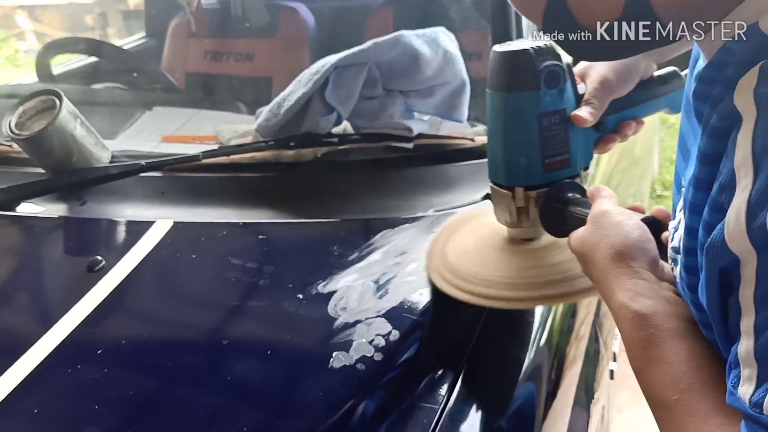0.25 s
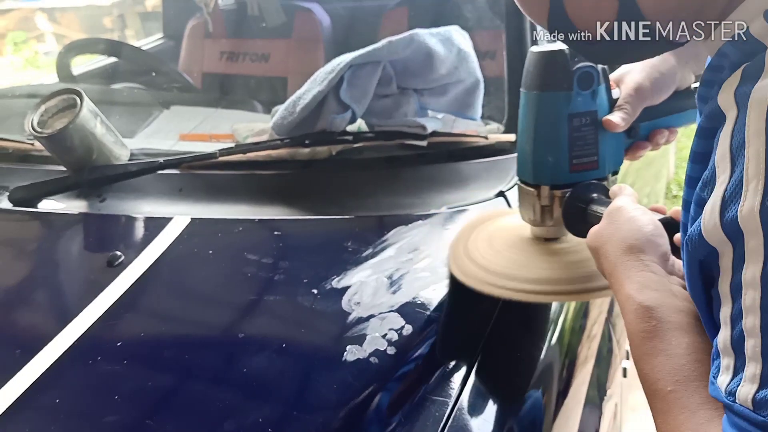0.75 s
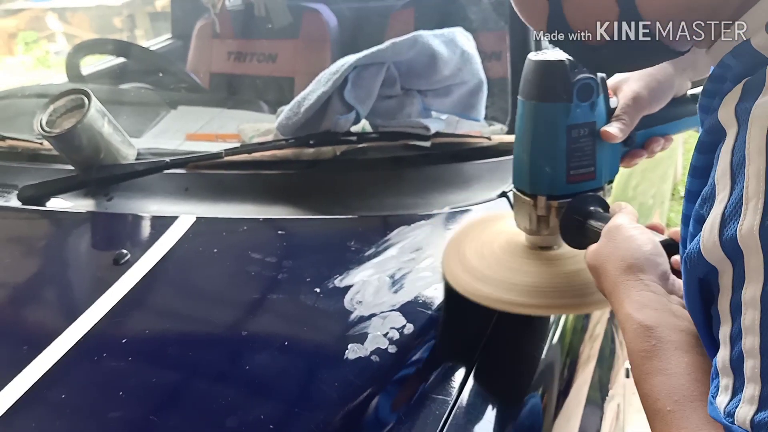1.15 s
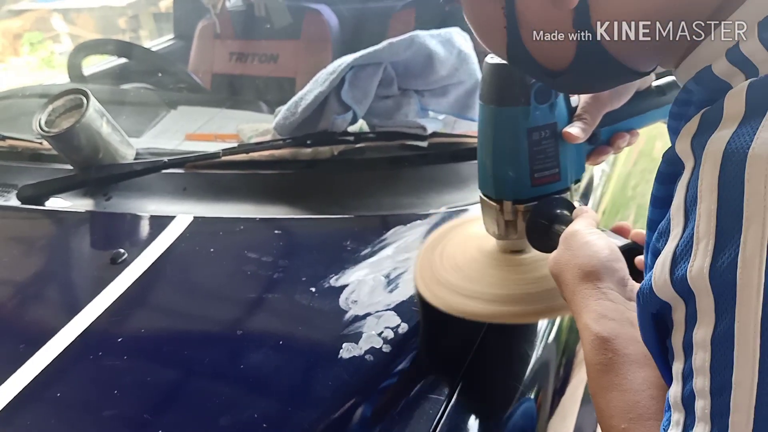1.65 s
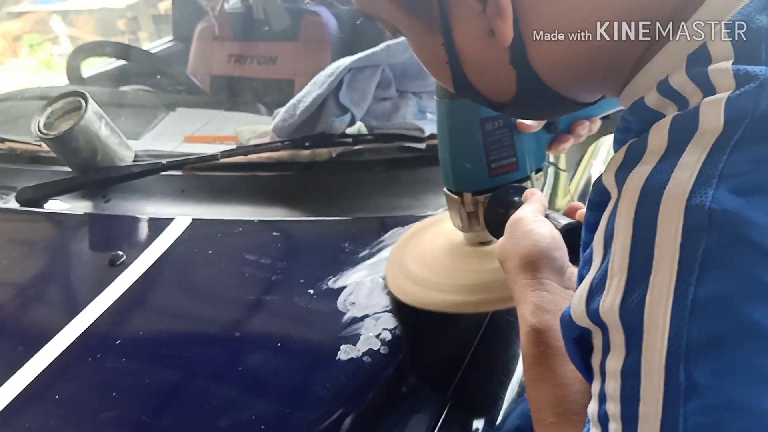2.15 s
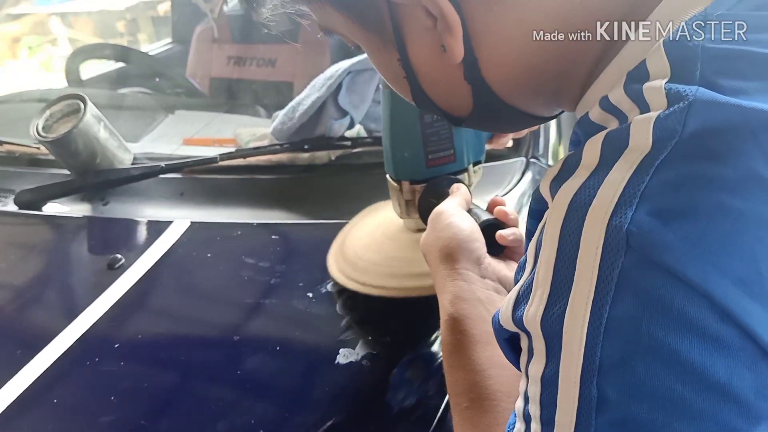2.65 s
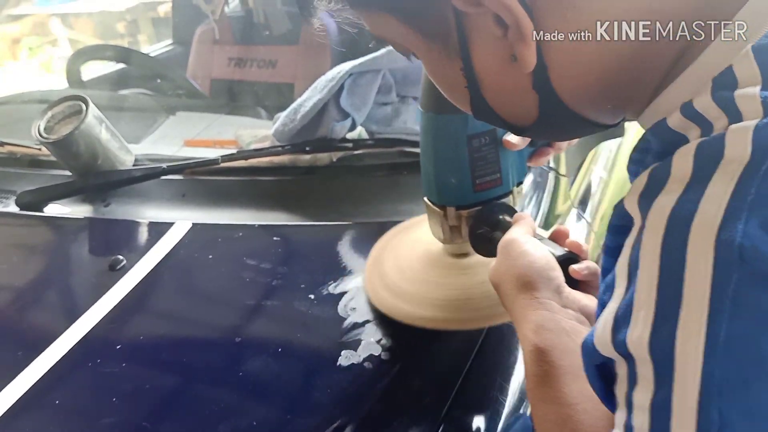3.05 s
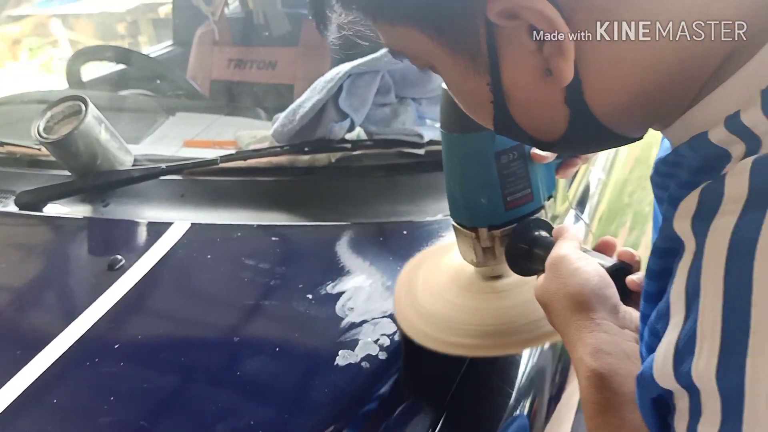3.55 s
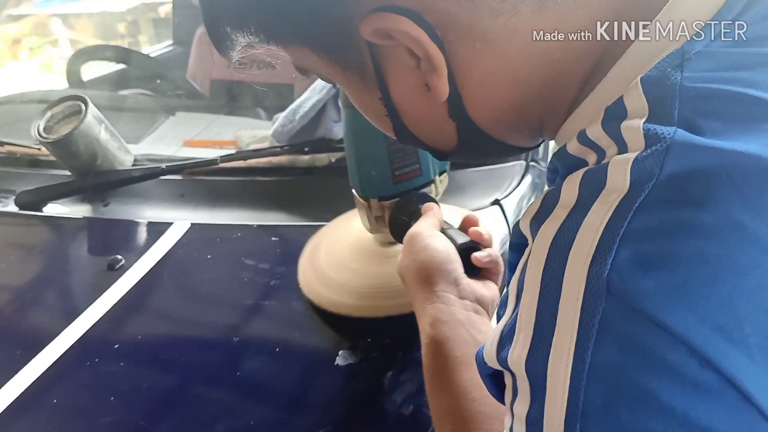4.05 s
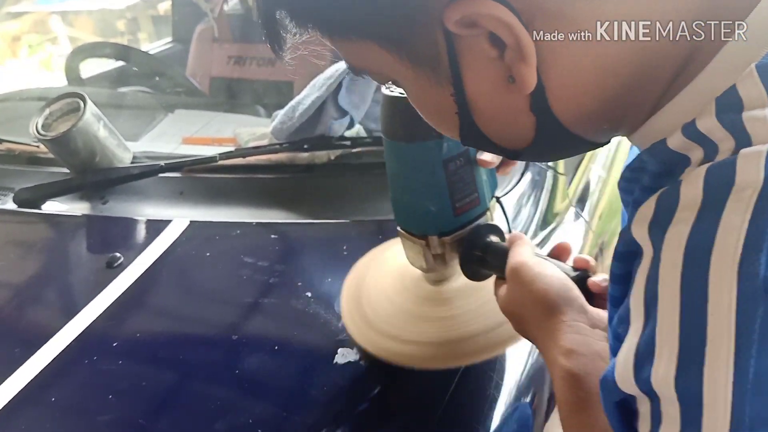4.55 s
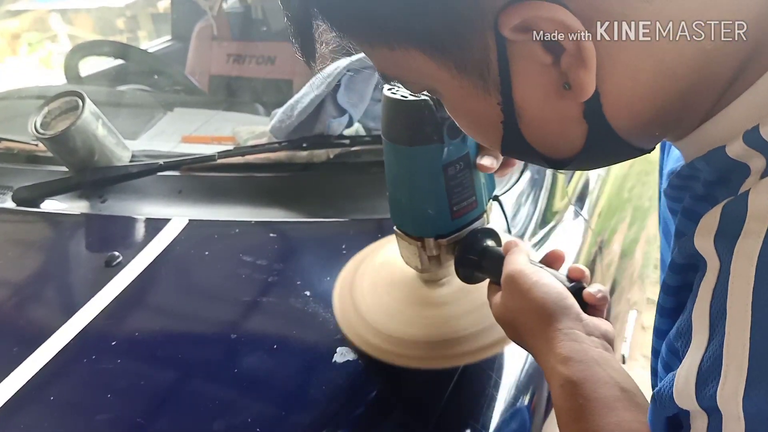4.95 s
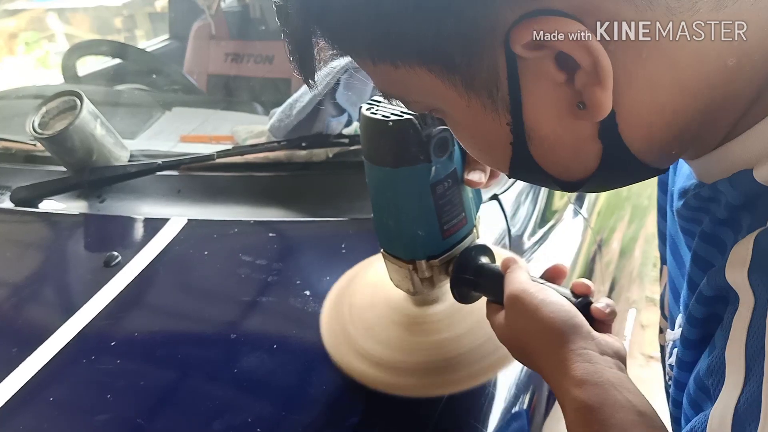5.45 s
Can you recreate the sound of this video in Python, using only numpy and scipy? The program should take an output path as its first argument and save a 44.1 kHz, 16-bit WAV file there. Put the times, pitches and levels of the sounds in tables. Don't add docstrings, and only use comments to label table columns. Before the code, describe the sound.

Close up, a hand-held power polisher revs to a harsh geared whine and buffs a metal panel, its pitch drifting slightly with pressure.

```python
import sys
import numpy as np
from scipy import signal
from scipy.fft import rfft, irfft, next_fast_len
from scipy.io import wavfile
from scipy.ndimage import uniform_filter1d, minimum_filter1d, map_coordinates

SR = 44100
rng = np.random.default_rng(int(sys.argv[2]) if len(sys.argv) > 2 else 0)


def nominal_scale(level):
    x = np.asarray(level, float) / 20
    return 10 ** x


def bounce(signal):
    frames = np.transpose(np.atleast_2d(signal))
    limited = np.clip(frames, -1, 1)
    pcm = np.round(limited * 32767).astype(np.int16)
    wavfile.write(sys.argv[1], SR, pcm)


N = 250929
TIME = np.arange(N) / SR
PINION_TEETH, CROWN_TEETH = 7, 41
# [t/s, tooth load/dB, pad pressure/dB, vents facing the phone/dB]
HANDLING = [(0, -4, 4, -5), (.1, 0, 0.5, -1), (.35, 1.5, 3, 1.5), (.75, -1.5, 2, -1), (1.0, -1, -0.5, -3),
            (1.3, -0.5, -2, 0), (1.75, 1.5, 1.5, -1), (2.2, -0.5, -1.5, -1.5), (2.7, -5, -0.5, -0.5),
            (2.97, -3, 2, 1), (3.25, 0, 0, 0), (3.6, -3, -1, 0), (3.85, 0, 0, 0.5), (4.1, -3.5, -1.5, 0.5),
            (4.35, -3, 2, 0), (4.75, 0, -1, 2), (5.05, -3.5, -1.5, 1), (5.69, -3.5, -1, 2)]


def unit(x):
    return x / np.sqrt(np.mean(x ** 2) + 1e-20)


def along(points, hz):
    f, level_db = np.transpose(points)
    return np.interp(np.log(hz + 1), np.log(f + 1), level_db)


def curves(rows):
    s, *columns = np.transpose(rows)
    return [np.interp(TIME, s, column) for column in columns]


def bump(at_s, width_s):
    return np.exp(-((TIME - at_s) / width_s) ** 2)


def wobble(rate):
    return map_coordinates(rng.standard_normal(int(N * rate / SR) + 4), [TIME * rate], order=1)


def turning(rows):
    return sum(db * bump(s, width) for s, width, db in rows)


def housing(hz):
    # [f/Hz, width/Hz, rms level of a full-strength tone/dB]
    modes = [(1070, 270, -33), (1561, 495, -25), (2326, 83, -25), (2729, 460, -26), (3327, 75, -30),
             (3565, 390, -24), (4690, 1030, -33.5), (5500, 630, -25.5), (6156, 160, -30), (7610, 190, -39),
             (8144, 320, -36), (9780, 240, -35), (11250, 760, -43), (13000, 400, -60)]
    power = 0
    for centre, width, db in modes:
        power = power + (nominal_scale(db) / (1 + (2 * (hz - centre) / width) ** 2)) ** 2
    return 10 * np.log10(power)


def tone(angle, db, flutter_db, rate):
    return np.sqrt(2) * nominal_scale(db + flutter_db * wobble(rate)) * np.sin(angle + 2 * np.pi * rng.random())


def rush(spectrum, patchy_db):
    z = signal.stft(rng.standard_normal(N + 512), nperseg=512)[2]
    field = uniform_filter1d(rng.standard_normal(z.shape), size=4, axis=0)
    field = uniform_filter1d(field, size=16, axis=1)
    x = signal.istft(z * nominal_scale(patchy_db * unit(field)), nperseg=512)[1][:N]
    m = next_fast_len(N + 8192)
    colour = nominal_scale(along(spectrum, np.fft.rfftfreq(m, 1 / SR)))
    return unit(irfft(rfft(x, m) * colour, m)[:N])


def roar(pad, cage, mains):
    # [f/Hz, level/dB per Hz]
    case_low = [(310, -50), (520, -14), (616, -19), (740, -3), (800, 2), (845, -3.5), (873, 6.5),
                (905, -0.5), (1030, -0.5), (1170, -4), (1290, -4), (1400, -8.5), (1820, -31), (3080, -120)]
    case_high = [(710, -60), (1200, -23), (1360, -7), (1570, -2.5), (1730, -2.5), (1950, -4.5), (2360, 4.5),
                 (2810, -4.5), (3400, -21), (4420, -23), (7480, -120)]
    fan_air = [(1760, -26), (3000, -0.5), (3410, -8), (3900, -3), (4500, -11), (5480, -6.5), (6790, -22.5),
               (8000, -31), (10400, -60), (17600, -120)]
    brush_hiss = [(4500, -43), (6900, -4), (7700, -3), (8500, -0.5), (9300, -6), (10100, -1), (10600, -3),
                  (11400, -0.5), (12100, -4.5), (12600, -2), (13400, 0.5), (14300, -4), (15500, -6),
                  (16500, -60)]
    paint_rub = [(26, -41), (45, -35), (65, -21), (86, -5.5), (188, -7), (226, -1), (268, -4.5), (403, 1.5),
                 (607, -6.5), (680, 1), (880, -24), (1500, -120)]

    _, press_db, facing_db = curves(HANDLING)
    skip_db = -12 * bump(5.27, .022)
    growl_db = 3.5 * bump(.31, .22)
    low_db = -37 + .41 * press_db + growl_db
    high_db = -24.5 + press_db + .27 * skip_db
    fan_db = -32 + .59 * press_db + facing_db
    brush_db = -54.5 + .18 * press_db + 1.05 * facing_db
    rub_db = -46.5 + .33 * press_db + skip_db

    drag = wobble(30)
    throb = nominal_scale(1.8 * wobble(2.46)) * np.cos(pad + 1)
    throb = throb + .9 * np.sin(mains - cage) + .24 * np.cos(2 * pad + .79)
    rub = nominal_scale(rub_db) * rush(paint_rub, patchy_db=.5)
    low = nominal_scale(low_db + .087 * throb) * rush(case_low, patchy_db=-1.7)
    high_db = high_db + .9 * throb + 1.4 * np.sin(mains) + .8 * drag
    high = nominal_scale(high_db) * rush(case_high, patchy_db=.6)
    fan_db = fan_db + .3 * throb + .42 * np.sin(mains) + .35 * drag
    fan = nominal_scale(fan_db) * rush(fan_air, patchy_db=1.5)
    sparks = unit(nominal_scale(.3 * throb + .6 * drag + 2.2 * wobble(1500)))
    brushes = nominal_scale(brush_db) * sparks * rush(brush_hiss, patchy_db=1.1)
    return rub + low + high + fan + brushes


def panel(pad, cage, mains):
    # [t/s, half width/s, peak level/dB]
    cage_swells = [
        (.83, 0.14, -53),
        (1.35, 0.12, -54),
        (3.05, 0.16, -61),
        (4.04, 0.18, -57),
        (4.5, 0.16, -39.5),
        (5.09, 0.11, -47),
        (5.6, .1, -54),
    ]
    hum_swells = [
        (.16, .07, -48),
        (.41, 0.14, -50.5),
        (.7, 0.11, -54),
        (1.25, .1, -50.5),
        (1.47, 0.13, -49),
        (2.3, 0.58, -54.5),
        (3.5, 0.21, -56.5),
        (4.22, 0.13, -49),
    ]
    double_swells = [
        (.58, .08, -64),
        (1.11, 0.065, -59),
        (1.38, 0.14, -60),
        (2.0, 0.26, -55.5),
        (3.0, 0.17, -59.5),
        (3.46, .12, -57),
        (4.44, .12, -50),
        (4.83, 0.14, -59),
        (5.2, 0.088, -48.5),
    ]
    pad_swells = [
        (.41, .1, -54),
        (4.58, 0.091, -54),
    ]
    rest_levels = (-60.5, -60.5, -59.5, -70)

    orders = ((cage, cage_swells), (mains, hum_swells), (2 * cage, double_swells), (3 * pad, pad_swells))
    out = np.zeros(N)
    for (angle, swells), rest_db in zip(orders, rest_levels):
        strength = nominal_scale(rest_db - 8 * bump(0, .5))
        for s, width, db in swells:
            strength = strength + nominal_scale(db) * bump(s, width)
        out += strength * tone(angle, 0, flutter_db=-1.7, rate=3.8)
    return out


def armature(shaft, shaft_hz, mains):
    # [f/Hz, rms level/dB]
    unbalance = [(230, -61), (560, -66), (900, -55), (1250, -61), (2300, -43), (3000, -54), (4500, -62),
                 (6000, -64), (7000, -76), (9000, -84), (14000, -89)]
    # [t/s, half width/s, level/dB]
    slot_turns = [
        [(1.7, 0.41, -2), (2.8, 0.37, 5.5), (4.2, 0.29, 6.5), (5.2, 1, -1.5)],
        [(1.7, 0.47, 5), (2.5, .25, -9), (3.1, 0.22, 3.5), (4.3, .2, -2), (5.3, 0.55, -5)],
        [(3.5, .5, -10), (1.9, .3, -8)],
    ]

    firm_db = -14 * np.exp(-(TIME / 1.1) ** 4)
    slots, slot_hz = 12 * shaft, 12 * shaft_hz
    first_db = -8 + housing(slot_hz) + .21 * firm_db + turning(slot_turns[0])
    second_db = -17.5 + housing(2 * slot_hz) + turning(slot_turns[1]) + .6 * wobble(3)
    high_db = -84.5 + 3.5 * TIME + turning(slot_turns[2]) + 1.5 * wobble(3.2)
    out = tone(slots, first_db, flutter_db=.5, rate=13)
    out += tone(2 * slots + .97 * wobble(120), second_db + firm_db - .5, flutter_db=1.4, rate=30)
    out += tone(38 * shaft, high_db, flutter_db=-2.0, rate=12)

    eased = 1 / (1 + np.exp((4.4 - TIME) / .1))
    for side, grow_db in ((-mains, 9), (mains, 3)):
        out += tone(slots + side, first_db - 8 + grow_db * eased, flutter_db=2.5, rate=9)

    for k in range(1, 64):
        if k % PINION_TEETH and k not in (12, 24, 38):
            order_db = along(unbalance, k * shaft_hz[-1]) + firm_db + 1.5 * rng.standard_normal()
            out += tone(k * shaft, order_db, flutter_db=3.5, rate=3)
    return out


def gears(mesh, mesh_hz, pad, cage, mains):
    multiples = (1, 2, 3, 5, 4, 6, 7, 8)
    strengths = (0, -6, -14.5, -20.5, -17.5, -33, -25, -22)
    torque_gains = (0, 9, 6.5, 5.5, -3, -10, 0, 0)
    fadings = (0.12, 1.4, 0.53, 1, 2.2, 2, 1.2, 2)
    # [t/s, half width/s, level/dB]
    strong_turns = [
        [(.05, 0.093, -9), (.36, .05, -2.5), (.54, 0.077, -5)],
        [(.03, .05, -6.5), (.84, 0.14, 3), (1.1, 0.13, -2), (1.7, 0.29, -4), (2.3, .25, 4.5), (3.4, .5, -3), (4.7, 0.13, 6), (5.0, .1, -1), (5.3, 0.089, 6)],
        [(.05, .04, 10), (.19, 0.033, 6), (.42, .16, 9.5), (.74, .1, -12), (2.9, 1, 5.5), (1.25, 0.17, 8.5), (4.25, 0.51, 8), (4.81, 0.087, -8), (5.3, 0.52, 3)],
    ]
    thin_turns = [
        [(.9, .15, 6), (2.2, 0.2, 11), (2.93, .1, -6), (3.45, 1, 7.5), (4.15, .08, -6), (5.3, 0.26, 3)],
        [(.55, .2, -8), (1.35, 0.22, 0.5), (2.5, .3, -6)],
        [(.7, .3, -10), (5.1, .5, 0)],
        [(.7, .3, -7), (1.9, .6, 7), (2.75, .2, -12)],
        [(2.2, .2, 5), (3.1, .4, 9), (4.1, .2, 6)],
    ]

    tooth_db, _, facing_db = curves(HANDLING)
    tilt_s, tilt_width_s = 3.2, .9
    runout_db = 9.5 * bump(tilt_s, tilt_width_s)
    tilt_db = 3 * bump(tilt_s, tilt_width_s / 2)
    # angle, lower and upper sideband/dB, lag/rad
    swings = ((pad + 1.3, -16 + runout_db, -21 + runout_db, -.7),
              (cage - 2.3, -19 + 1.6 * TIME - tilt_db, -13.5 - tilt_db, .1),
              (mains, -19, -14, 1.5),
              (2 * pad + 1.4, -16 + tilt_db, -17 + tilt_db, .5))
    load = 1
    for turn, below_db, above_db, lag in swings:
        load = load + nominal_scale(below_db) * np.exp(-1j * turn) + nominal_scale(above_db) * np.exp(1j * (turn + lag))

    run_up = np.exp(-(TIME / .5) ** 4)
    slack = (.04 + .3 * np.exp(-(TIME / .9) ** 4)) * wobble(200)
    out = np.zeros(N)
    overtones = zip(multiples, strengths, torque_gains, fadings, strong_turns + thin_turns)
    for k, db, torque_db, fading_db, turns in overtones:
        hands_db = tooth_db if k == 1 else .8 * facing_db * (k > 3)
        db = db + housing(k * mesh_hz) + hands_db + turning(turns) + fading_db * wobble(4)
        flutter_db = (1.02 + 1.2 * run_up) * wobble(24.89)
        strength = np.sqrt(2) * nominal_scale(db + torque_db * run_up + flutter_db)
        phase = k * (mesh + slack) + 2 * np.pi * rng.random()
        out += strength * np.real(load * np.exp(1j * phase))
    return out


def scene():
    # [t/s, settled mesh rate f/Hz]
    loaded_speed = [(0, 1500), (.6, 1497), (.93, 1512), (1.15, 1552), (1.37, 1553), (1.72, 1600),
                    (1.93, 1600), (2.47, 1535), (2.7, 1524), (2.9, 1567), (3.6, 1601), (4.0, 1553),
                    (4.13, 1551), (4.43, 1632), (4.98, 1625), (5.17, 1644), (5.46, 1623), (5.69, 1630)]
    lag_hz, run_up_s = 860, .35
    mesh_hz = uniform_filter1d(curves(loaded_speed)[0], size=5000) - lag_hz * np.exp(-TIME / run_up_s)
    mesh = 2 * np.pi * np.cumsum(mesh_hz) / SR
    shaft, pad = mesh / PINION_TEETH, mesh / CROWN_TEETH
    cage = .3507 * shaft
    mains = 2 * np.pi * 99.9 * TIME
    mix = roar(pad, cage, mains) + panel(pad, cage, mains)
    mix = mix + armature(shaft, mesh_hz / PINION_TEETH, mains) + gears(mesh, mesh_hz, pad, cage, mains)
    return mix[None]


def top_cut(x):
    return signal.sosfilt(signal.butter(12, 15730, fs=SR, output="sos"), x)


def record(dry):
    dry = signal.sosfilt(signal.ellip(8, .5, 30, 15560, fs=SR, output="sos"), dry)
    dry = signal.sosfilt(signal.butter(2, 45, "high", fs=SR, output="sos"), dry)
    ceiling = .345
    needed = np.minimum(1, ceiling / (np.abs(dry) + 1e-9))
    gain = uniform_filter1d(minimum_filter1d(needed, size=129), size=65)
    return top_cut(dry * gain + .0005)


dry = scene()
out = record(dry)
bounce(out)
```